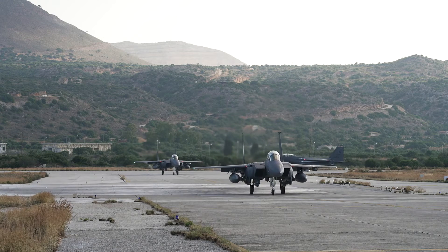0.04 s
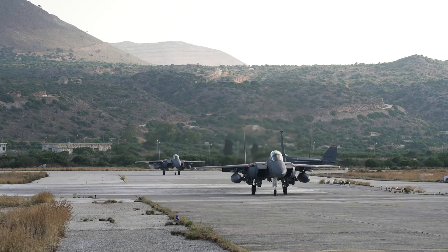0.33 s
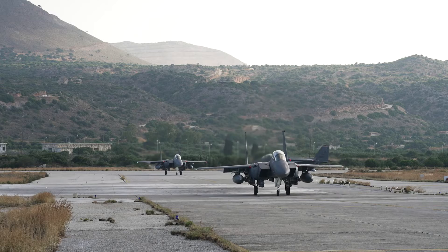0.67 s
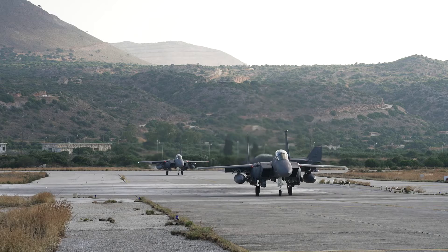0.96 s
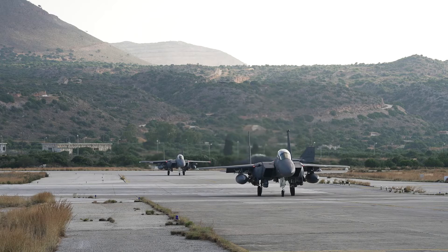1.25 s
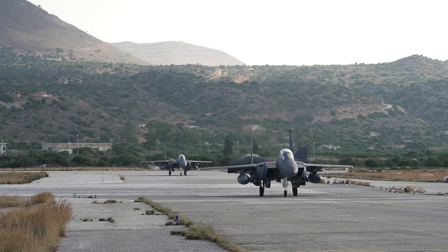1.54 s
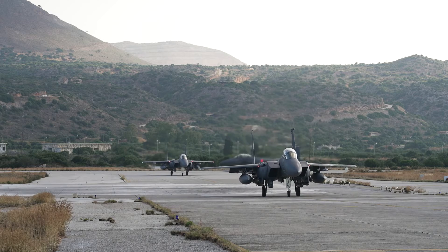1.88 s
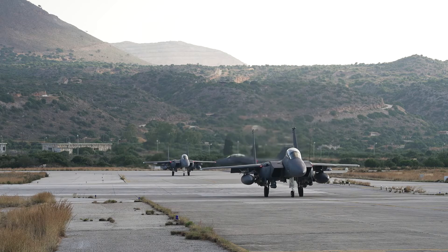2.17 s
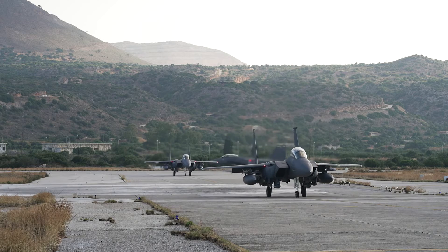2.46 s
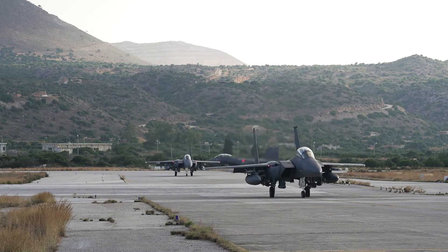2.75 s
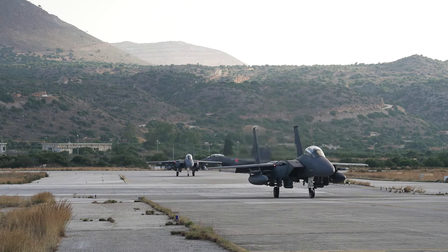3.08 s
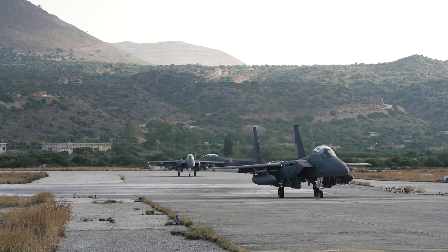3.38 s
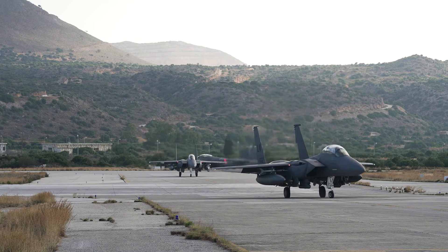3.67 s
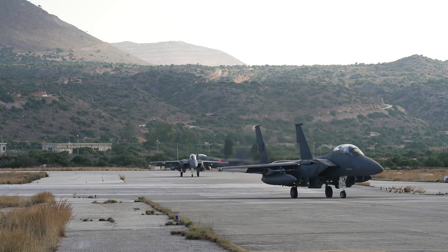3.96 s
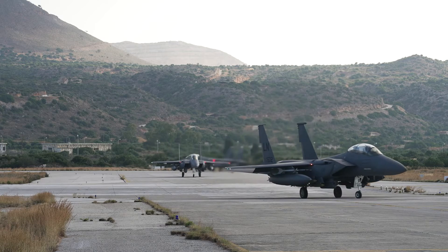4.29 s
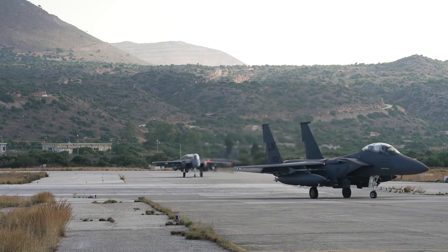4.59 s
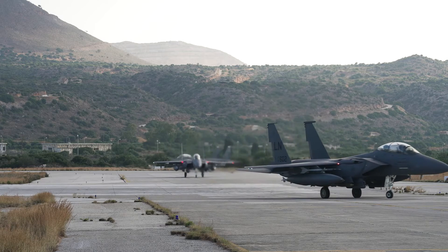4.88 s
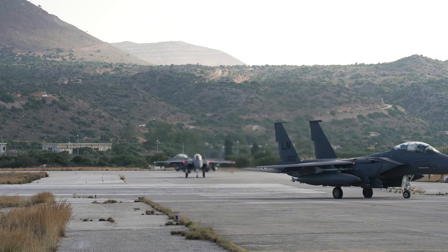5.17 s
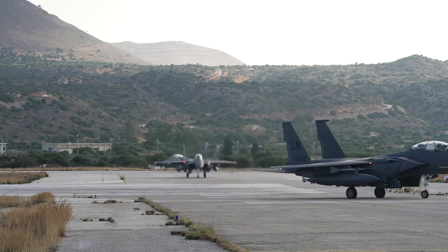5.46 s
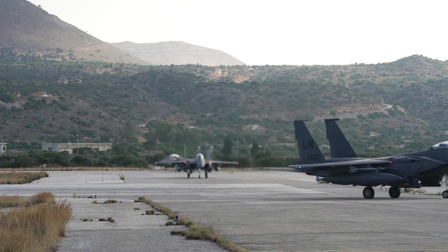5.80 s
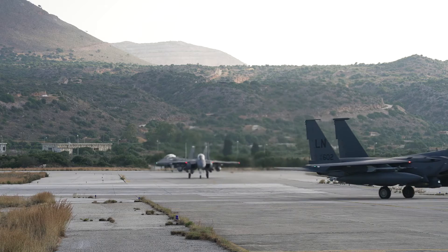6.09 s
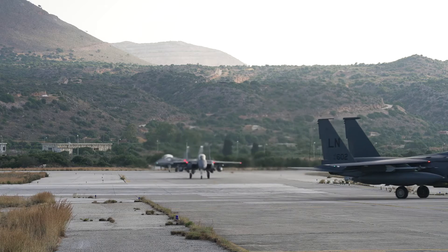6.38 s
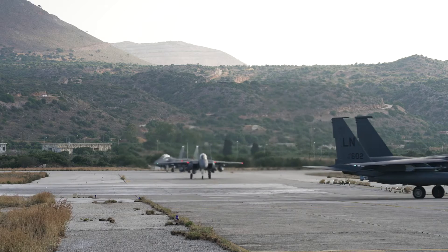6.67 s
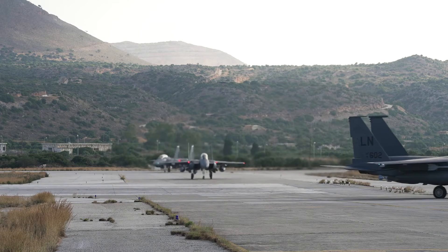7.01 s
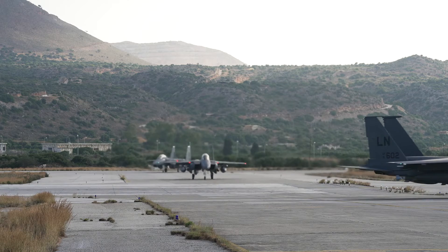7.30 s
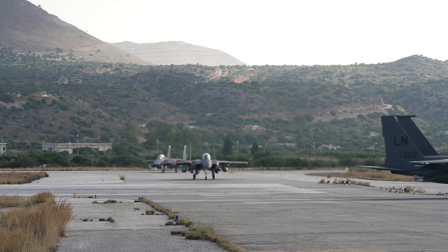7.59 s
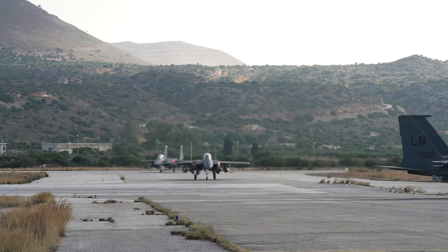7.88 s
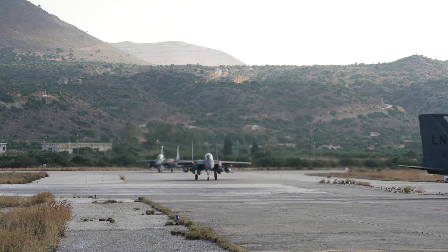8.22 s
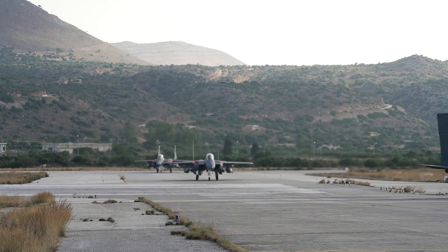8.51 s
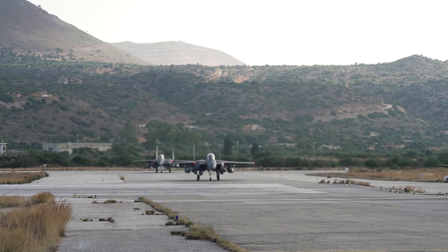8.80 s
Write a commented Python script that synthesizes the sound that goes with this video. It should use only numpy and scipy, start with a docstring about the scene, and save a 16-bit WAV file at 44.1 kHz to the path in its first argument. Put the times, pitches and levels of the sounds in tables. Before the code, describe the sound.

A twin-engined fighter jet taxis closer on an open airfield, its engines giving a high, steady whine over a strong hiss, with a roar and faint rumble beneath. The sound swells as it turns side-on and leans to the right. As it rolls away, one whine slides down, another climbs, and a short, hollow rising hoot sounds near the end. The microphone stays in one spot.

```python
"""A twin-engined fighter jet taxis closer, turns and rolls off to the right, with more jets idling behind.
Its compressors (the spinning blades that squeeze the air) whine, and churning air blurs each tone.
Air hisses into the intakes at the front, and the exhaust roars and rumbles at the back.
As the jet turns away one whine slides down, another climbs, and air ringing in a duct swells
into a short rising hoot."""
import sys
import numpy as np
from scipy import signal
from scipy.fft import rfft, irfft, next_fast_len
from scipy.io import wavfile
from scipy.ndimage import uniform_filter1d

SR = 44100
rng = np.random.default_rng(int(sys.argv[2]) if len(sys.argv) > 2 else 0)


def file_out(sig):
    """Save sig as 16-bit WAV at sys.argv[1]."""
    # one column per channel
    cols = np.atleast_2d(sig).T
    # limit, then scale
    lim = np.clip(cols, -1, 1)
    pcm = np.round(lim * 32767).astype(np.int16)
    wavfile.write(sys.argv[1], SR, pcm)


N = 390285
TIME = np.arange(N) / SR
# the jet starts to turn, is side-on, its whines start to slide, its tail swings round, the hoot begins
TURN_S, SIDE_ON_S, SLIDE_S, TAIL_S, HOOT_S = 2.5, 4.92, 6.7, 6.97, 7.5


def undb(db):
    """Turn decibels into a number to multiply by."""
    return 10 ** (np.asarray(db) / 20)


def unit(x):
    """Scale a sound to an average (rms) strength of 1."""
    return x / np.sqrt(np.mean(np.abs(x) ** 2))


def curves(table, at=TIME):
    """Join a table's rows with straight lines: one curve over time for each value column."""
    times, *columns = np.transpose(table)
    return [np.interp(at, times, column) for column in columns]


def over_hz(table, hz):
    """Join a table's rows along frequency, giving each octave equal room."""
    row_hz, *columns = np.transpose(table)
    return [np.interp(np.log(hz + 1), np.log(row_hz), column) for column in columns]


def bell(x, centre, width):
    """A smooth bump in frequency or time, 1 at its centre."""
    return np.exp(-((x - centre) / width) ** 2)


def onset(at_s, ease_s, t=TIME):
    """A smooth step from 0 to 1, halfway at at_s."""
    return (1 + np.tanh((t - at_s) / ease_s / 2)) / 2


def spell(from_s, to_s, ease_s, t=TIME):
    """Fade in, hold, fade out."""
    return onset(from_s, ease_s, t) * (1 - onset(to_s, ease_s, t))


def swell_db(peak_s, rise_db_per_s, fall_db_per_s):
    """A level that climbs to 0 dB and falls again, as a beam of sound sweeps past."""
    return np.minimum((TIME - peak_s) * rise_db_per_s, (peak_s - TIME) * fall_db_per_s)


def settle(first, final, start_s, time_s, t=TIME):
    """A glide that passes `first` at start_s and slows as it nears `final`."""
    return final + (first - final) * np.exp(np.minimum((start_s - t) / time_s, 1))


def wobble(per_s):
    """A smooth random wobble, about 1 in size, that picks a new value per_s times a second."""
    hold = int(SR / per_s)
    steps = np.repeat(rng.standard_normal(1024), hold)[:N]
    return 1.3 * uniform_filter1d(uniform_filter1d(steps, hold), hold)


def noise(colour):
    """Two unrelated noises of one tone colour: one that left and right share, one that sets them apart."""
    size = next_fast_len(N, True)
    db, = over_hz(colour, np.fft.rfftfreq(size, 1 / SR))
    spectrum = rfft(rng.standard_normal((2, size))) * undb(db)
    return unit(irfft(spectrum)[:, :N])


def blurred_tone(hz, width_hz, skirt):
    """A tone smeared by churning air, in two rows like noise(); a bigger skirt spreads its edges more."""
    hold = 8  # samples per random value
    churn = rng.standard_normal((2, N // hold + 1, 2)) @ np.array([1, 1j])
    for corner_hz in (width_hz / 2, width_hz * skirt / 2):
        churn = signal.lfilter([1], [1, -np.exp(-2 * np.pi * corner_hz * hold / SR)], churn)
    churn = signal.resample_poly(churn, hold, 1, axis=1)[:, :N]
    phase = 2 * np.pi * np.cumsum(np.broadcast_to(hz, N)) / SR
    tone = (churn * np.exp(1j * phase)).real
    bass_cut = signal.butter(2, np.mean(hz) / 2, "high", fs=SR, output="sos")
    return unit(signal.sosfilt(bass_cut, tone))


# how strongly the intakes aim the upper whine at the listener: t/s, level/dB
WHINE_BEAM = [(0.0, -38), (0.3, -35), (0.7, -35.8), (0.95, -32.6), (1.5, -30.5), (1.92, -29.8), (2.1, -32),
              (2.5, -33), (2.93, -33.2), (3.1, -31), (3.6, -33), (4.15, -32), (4.6, -34.2), (5.62, -37),
              (5.85, -34.3), (6.2, -38.6), (6.7, -41.5)]
# the upper whine eases down to a steady pitch: t/s, f/Hz
UPPER_PITCH = [(0, 3247), (1.8, 3237), (3.6, 3212), (7, 3216)]
# fainter tones above it: multiple of its pitch, width/Hz, relative level/dB head-on and once turned
OVERTONES = [(1.298, 110, -1.3, 0), (1.605, 200, -4, -3.2), (1.665, 170, -1.5, -3), (1.955, 175, -5, -5.5),
             (2.335, 160, -5.5, -6.8), (2.62, 240, -14, -10), (2.95, 280, -18, -9)]


def compressor_whine(lower_db=-35.3, overtone_db=-37.4, turned_db=-5.5):
    """Two strong blade tones and their overtones, fading highest first as the intakes turn away."""
    wander = 1 + .002 * wobble(9)
    lower_hz = (2138 - 6.8 * TIME) * wander  # sinks as the jet slows
    upper_hz = curves(UPPER_PITCH)[0] * wander
    beam_db, = curves(WHINE_BEAM)
    off_beam_db = beam_db - beam_db.max()
    lower = blurred_tone(lower_hz, width_hz=54, skirt=10)
    lower *= undb(lower_db + .49 * off_beam_db + .8 * wobble(12))  # lower tones are aimed less tightly
    upper = blurred_tone(upper_hz, width_hz=82, skirt=9.3)
    upper *= undb(beam_db + .34 + 1.2 * wobble(40))
    turned = onset(TURN_S, ease_s=.19)
    overtones = 0
    for multiple, width_hz, head_db, side_db in OVERTONES:
        level_db = head_db + turned * (side_db + turned_db - head_db)
        overtones += blurred_tone(upper_hz * multiple, width_hz, skirt=2.9) * undb(level_db)
    high = upper + overtones * undb(overtone_db + off_beam_db)
    return lower * (1 - onset(7.15, ease_s=.05)) + high * (1 - onset(6.9, ease_s=.22))


# the low whine of the engine fans: t/s, f/Hz, relative level/dB
FAN_WHINE = [(0.0, 1101, -48), (0.24, 1191, -46.5), (1.45, 1011, -45), (1.82, 980.6, -47.5),
             (3.92, 975, -46.5), (6.16, 955, -50.5), (6.3, 1040, -57), (6.5, 1030, -49.5), (7.2, 1051, -47),
             (7.8, 1111, -45.5), (8.85, 1120, -42)]


def fan(gain_db=-3, whistle_db=-45, fall_db_per_s=12):
    """The fans' broad rush; once past side-on it narrows, whistles briefly and fades."""
    hz, level_db = curves(FAN_WHINE)
    broad = blurred_tone(hz * (1 + .04 * wobble(7)), width_hz=280, skirt=1)
    narrow = blurred_tone(hz * (1 + .02 * wobble(18)), width_hz=160, skirt=1) * undb(1.5 * wobble(14))
    whistle = blurred_tone(985, width_hz=45, skirt=2) * bell(TIME, 5.33, .11)
    narrowed = onset(SIDE_ON_S, ease_s=.09)
    rush = np.sqrt(1 - narrowed) * broad + np.sqrt(narrowed) * narrow
    fade_db = fall_db_per_s * np.maximum(TIME - TAIL_S, 0)
    return rush * undb(level_db + gain_db - fade_db) + whistle * undb(whistle_db)


# how loudly air is sucked into the intakes: t/s, relative level/dB
INTAKE_FLOW = [(0.0, -49), (0.2, -52), (0.52, -48), (0.7, -43), (1.62, -42.5), (2.49, -46), (3.15, -45),
               (3.7, -42.5), (4.44, -44), (5.6, -49), (7.12, -54), (8.85, -50.5)]
# tone colour of the main hiss: f/Hz, level/dB
HISS_COLOUR = [(100, -48), (1200, -16), (2000, 1), (2400, 6), (2900, -4), (3700, 5.5), (4600, 4), (5600, 0),
               (7000, -32), (9000, -51), (14000, -41)]
# tone colour of the bright sizzle above it: f/Hz, level/dB
SIZZLE_COLOUR = [(500, -55), (3500, -5.5), (6000, 6), (8000, 5), (9200, 2), (10500, -3), (12000, -7),
                 (14000, -13.5), (15000, -24)]


def intake(hiss_db=-36, blocked_db=-5.5, rush_db=-40.5):
    """Air hisses into the engines; a rush sweeps past, then the jet's body blocks some of the hiss."""
    flow_db, = curves(INTAKE_FLOW)
    facing_db = blocked_db * onset(SIDE_ON_S, ease_s=.11) + .5 * onset(TAIL_S, ease_s=.069)
    hiss = noise(HISS_COLOUR) * undb(hiss_db + .55 * (flow_db - flow_db.max()) + facing_db)
    sizzle = noise(SIZZLE_COLOUR) * undb(flow_db + 3 + .4 * wobble(22))
    rush_hz = 4100 - 400 * onset(4.65, ease_s=.25)
    rush = blurred_tone(rush_hz, width_hz=490, skirt=1.1) * spell(4.4, SIDE_ON_S, ease_s=.064)
    return hiss + sizzle + rush * undb(rush_db)


# tone colour of the exhaust's main roar: f/Hz, level/dB
ROAR_COLOUR = [(50, -60), (300, -37), (780, -10), (1000, -2), (1400, -1), (1800, -3.5), (2400, 1),
               (3200, 1), (5000, -19.5), (14000, -53)]
# tone colour of its deep part: f/Hz, level/dB
DEEP_COLOUR = [(30, -50), (100, -28), (220, -7.5), (340, -6.5), (470, -2), (620, -2), (820, 3.5),
               (1050, -2.5), (1400, -19), (5000, -50)]
# tone colour of the rumble underneath: f/Hz, level/dB
RUMBLE_COLOUR = [(20, -27), (45, -15), (70, -8), (100, 0.5), (150, 2.5), (230, 3), (330, -0.5), (700, -4),
                 (1500, -41)]
# how loud the rumble is: t/s, level/dB
RUMBLE_LEVEL = [(0.0, -64), (1.5, -66), (2.7, -66.5), (4.1, -63.5), (5.6, -64.5), (6.9, -65), (8.0, -62.5),
                (8.85, -62.5)]


def exhaust(roar_db=-42, deep_db=-48, behind_db=-55):
    """The exhaust roars loudest mid-turn; its deep part returns as the back of the jet comes round."""
    turn_db = swell_db(4.4, rise_db_per_s=.53, fall_db_per_s=.72) - .13 * onset(SIDE_ON_S, ease_s=.1)
    roar = noise(ROAR_COLOUR) * undb(roar_db + turn_db)
    passing = undb(deep_db + swell_db(4.02, rise_db_per_s=2.04, fall_db_per_s=8.5))
    from_behind = undb(behind_db) * onset(7.83, ease_s=.34)
    deep = noise(DEEP_COLOUR) * np.hypot(passing, from_behind) * undb(.8 * wobble(6.8))
    rumble_db, = curves(RUMBLE_LEVEL)
    rumble = noise(RUMBLE_COLOUR) * undb(rumble_db + 1.8 * wobble(12))
    return roar + deep + rumble


# how loud the low engine hum is: t/s, level/dB
HUM_LEVEL = [(0.0, -74), (3.7, -71), (4.15, -62.5), (4.7, -62.5), (4.95, -71), (6.45, -72), (6.65, -61),
             (7.7, -64.5), (8.85, -63)]


def engine_hum(hz=181.5, roughness=.65):
    """The engines hum low: a clean tone, with a blurred one for a rough edge."""
    phase = 2 * np.pi * np.cumsum(hz * (1 + .008 * wobble(8))) / SR
    hum = np.sqrt(2) * np.sin(phase) + roughness * blurred_tone(hz, width_hz=26, skirt=2)
    return unit(hum) * undb(curves(HUM_LEVEL)[0])


# brief high whines: start t/s, end t/s, first f/Hz, target f/Hz, settling time/s, width/Hz, level/dB
THIN_WHINES = [(1.85, 2.42, 5330, 5170, .4, 300, -45), (6.6, 7.45, 3500, 3150, 1.3, 220, -52),
               (6.5, 8.1, 5400, 5000, .8, 380, -55.5), (7.3, 8.1, 6700, 6020, .28, 230, -58),
               (7.35, 8.2, 8600, 7750, .35, 300, -64), (7.7, 8.5, 4510, 4630, .3, 170, -53)]


def thin_whines():
    """Thin whines come and go as the jet turns, each gliding towards a steady pitch."""
    whines = 0
    for from_s, to_s, first_hz, target_hz, settle_s, width_hz, level_db in THIN_WHINES:
        tone = blurred_tone(settle(first_hz, target_hz, from_s, settle_s), width_hz, skirt=1.5)
        whines += tone * spell(from_s, to_s, ease_s=.05) * undb(level_db + wobble(12))
    return whines


def nozzle_ring(level_db=-65.5, fade_from_s=4.42, fall_db_per_s=3):
    """The exhaust outlet rings hollowly as the jet comes side-on, then gives way to the hoot."""
    ring = blurred_tone(472, width_hz=80, skirt=1.2) * spell(4.2, HOOT_S, ease_s=.1)
    return ring * undb(level_db - fall_db_per_s * np.maximum(TIME - fade_from_s, 0))


def sinking_whines(main_db=-45, flare_db=3.5, surge_db=-40.5, airy_db=-47.3):
    """A whine surges out of the upper blade tone, sinks and flares; a higher, airy one follows it."""
    hz = settle(3200, 2110, SLIDE_S, time_s=.82)
    level_db = main_db + .5 * (TIME - SLIDE_S) + flare_db * bell(TIME, 7.85, .34)
    main = blurred_tone(hz, width_hz=135, skirt=2.6) * onset(SLIDE_S, ease_s=.057)
    surge = blurred_tone(hz, width_hz=330, skirt=1.2) * bell(TIME, 6.92, .13)
    airy_hz = (4600 - 1350 * onset(7.5, ease_s=.45)) * (1 + .012 * wobble(25))
    airy = blurred_tone(airy_hz, width_hz=270, skirt=1.4)
    airy *= undb(1.5 * wobble(14) + swell_db(7.46, rise_db_per_s=17, fall_db_per_s=4.5))
    return main * undb(level_db) + surge * undb(surge_db) + airy * undb(airy_db)


def climbing_whine(level_db=-43.5):
    """A whine climbs out of the lower blade tone, swells as it crosses the sinking one, and frays."""
    hz = 2120 + 740 * onset(8.02, ease_s=.17)
    narrow = blurred_tone(hz, width_hz=194, skirt=2)
    wide = blurred_tone(hz, width_hz=760, skirt=.96)
    frayed = onset(8.1, ease_s=.075)
    whine = np.sqrt(1 - frayed) * narrow + np.sqrt(frayed) * wide
    crossing_db = 4 * bell(TIME, 7.95, .32)
    growth_db = swell_db(8.95, rise_db_per_s=1.5, fall_db_per_s=5)
    return whine * undb(level_db + crossing_db + growth_db + 1.6 * wobble(30))


def duct_hoot(hold_db=-48, peak_db=-43, peak_s=8.235, rush_db=-53, airy_db=-56):
    """Air rings in a duct: a clean, rising tone that flares briefly inside a breathy rush."""
    hz = settle(518, 552, HOOT_S, time_s=.45, t=np.maximum(TIME, HOOT_S))
    phase = 2 * np.pi * np.cumsum(hz * (1 + .001 * wobble(25))) / SR
    strength = undb(hold_db) * spell(7.77, 8.42, ease_s=.04) + undb(peak_db) * bell(TIME, peak_s, .11)
    tone = np.sqrt(2) * np.sin(phase) * strength * undb(1.6 * wobble(45))
    rush = blurred_tone(hz * .96, width_hz=240, skirt=1.4)
    rush *= undb(rush_db + swell_db(peak_s, rise_db_per_s=14, fall_db_per_s=14))
    airy = blurred_tone(hz * .94, width_hz=110, skirt=1) * spell(7.4, 8.45, ease_s=.1)
    shared_only = np.array([[1], [0]])
    return tone * shared_only + rush + airy * undb(airy_db)


# the path of a wandering dip in the treble: t/s, f/Hz, depth/dB
DIP_PATH = [(0.4, 10000, 0), (1.0, 10000, 2), (1.6, 10200, 2), (1.82, 10600, 3), (2.05, 9000, 4),
            (2.25, 9100, 4), (2.7, 10080, 6), (4.1, 9950, 6), (4.6, 9000, 0), (5.4, 9700, 7),
            (6.0, 9680, 8), (6.25, 9400, 0)]
# the dips that follow that path: share of its frequency, width/Hz, share of its depth
DIP_FAMILY = [(0.123, 93, 0.6), (.465, 228, 0.73), (.712, 272, .85), (.99, 260, 1)]
# hollows in the middle pitches: start t/s, end t/s, first f/Hz, last f/Hz, width/Hz, depth/dB
HOLLOWS = [(4.7, 7.6, 255, 345, 65, 6.5), (6.6, 7.45, 335, 335, 45, 3), (8.1, 9.2, 320, 300, 70, 4),
           (5.1, 6.25, 1210, 1250, 110, 4), (6.35, 6.7, 600, 570, 90, 3), (6.6, 7.5, 870, 830, 90, 7),
           (7.5, 8.4, 780, 760, 100, 12), (8.4, 9.2, 765, 790, 100, 8), (7.6, 8.3, 2850, 3250, 230, 4),
           (8.05, 9.2, 2030, 2030, 90, 5)]


def cancelling_db(hz, t):
    """Sound takes several paths, round the jet and off the concrete, and they cancel at some pitches."""
    dip_hz, dip_db = curves(DIP_PATH, t)
    dips = sum(share * bell(hz, ratio * dip_hz, width_hz) for ratio, width_hz, share in DIP_FAMILY)
    hollows_db = 0
    for from_s, to_s, first_hz, last_hz, width_hz, depth_db in HOLLOWS:
        centre_hz = np.interp(t, (from_s, to_s), (first_hz, last_hz))
        hollows_db += depth_db * bell(hz, centre_hz, width_hz) * spell(from_s, to_s, ease_s=.066, t=t)
    return -dip_db * dips - hollows_db


# two swoops of a very short echo: middle t/s, longest delay/ms, bend/(ms/s^2), length/s, depth/dB
ECHO_SWOOPS = [(2.205, .396, .445, .5, 2.4), (4.77, .5, .65, .5, 3.1)]


def echo_ripple_db(hz, t, slide_db=2.4):
    """A second, longer path ripples the treble; the ripples swoop twice, then slide down as it grows."""
    def ripple(delay_ms):
        return np.cos(2 * np.pi * hz * delay_ms / 1000)

    swoops_db = sum(depth_db * ripple(longest_ms - bend * (t - at_s) ** 2) * bell(t, at_s, length_s)
                    for at_s, longest_ms, bend, length_s, depth_db in ECHO_SWOOPS)
    growing_ms = settle(1.146, 1.74, SLIDE_S, time_s=.626, t=t)
    slide = ripple(growing_ms) * spell(6.2, 7.9, ease_s=.06, t=t)
    return swoops_db * bell(hz, 10000, 3000) + slide_db * slide * bell(hz, 5200, 3400)


def brightness_db(hz, t, dull_db=6, bright_db=5, brightest_s=5.9):
    """The top hiss is dull at first and brightest just after the jet is side-on."""
    height = np.minimum(hz / 12000, 1)
    at_first = 1 - onset(.87, ease_s=.18, t=t)
    return bright_db * bell(t, brightest_s, 1) * height ** 4 - dull_db * at_first * height ** 2


# how left and right differ: f/Hz, share of unrelated sound, multiplier on their level difference
STEREO_SPREAD = [(200, .0001, 0), (700, 0.0013, 0), (1220, 0.075, .45), (2230, 0.06, 0.77),
                 (3320, 0.019, 1.04), (4430, 0.075, 0.36), (7300, 0.15, 1.3), (14000, 0.15, 2.1)]


def reach_listener(sound, ahead_db=-2.4, crossed_db=-6.7, lag_samples=1.95, frame=1024):
    """Sound is coloured on its way; as the jet crosses right, the left treble gets softer and later."""
    hz, t, (shared, apart) = signal.stft(sound, SR, nperseg=frame)
    unrelated, shade = (column[:, None] for column in over_hz(STEREO_SPREAD, hz))
    hz = hz[:, None]
    shared, apart = shared * np.sqrt(1 - unrelated), apart * np.sqrt(unrelated)
    crossed = onset(6.25, ease_s=.95, t=t)
    left_minus_right_db = shade * (ahead_db + (crossed_db - ahead_db) * crossed)
    delay = np.exp(-2j * np.pi * hz * lag_samples * crossed / SR)
    left = (shared + apart) * undb(left_minus_right_db / 2) * delay
    right = (shared - apart) * undb(-left_minus_right_db / 2)
    colour = undb(cancelling_db(hz, t) + echo_ripple_db(hz, t) + brightness_db(hz, t))
    return signal.istft(np.array([left, right]) * colour, SR, nperseg=frame)[1][:, :N]


def scene():
    """Whines, hiss and roar waver together in the hot air over the concrete; hoot and hum join them."""
    shimmer = undb(.39 * wobble(14))
    whines = compressor_whine() + sinking_whines() + thin_whines() + climbing_whine()
    engines = whines + fan() + intake() + exhaust() + nozzle_ring()
    return reach_listener(engines * shimmer + duct_hoot() + engine_hum())


def record(dry):
    """Cut away the very highest pitches, above 14950 Hz."""
    return signal.sosfilt(signal.ellip(12, .1, 90, 14950, fs=SR, output="sos"), dry)


dry = scene()
out = record(dry)
file_out(out)
```